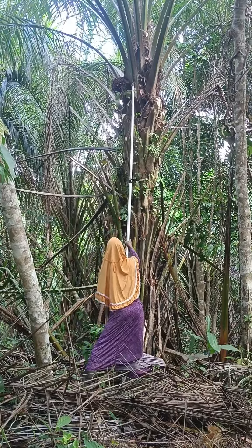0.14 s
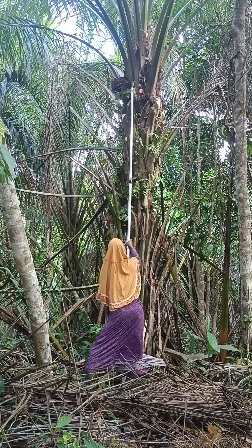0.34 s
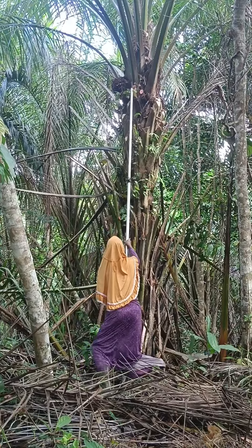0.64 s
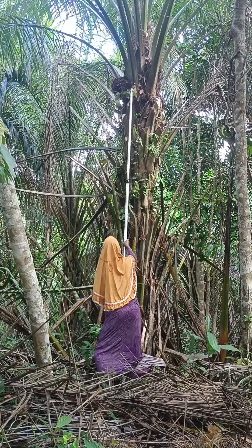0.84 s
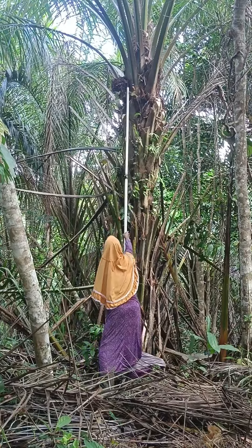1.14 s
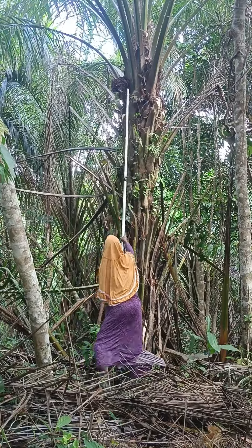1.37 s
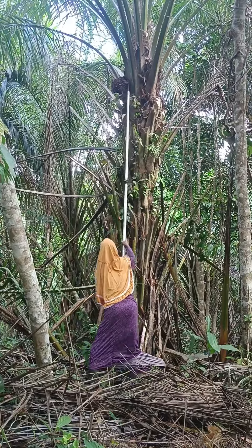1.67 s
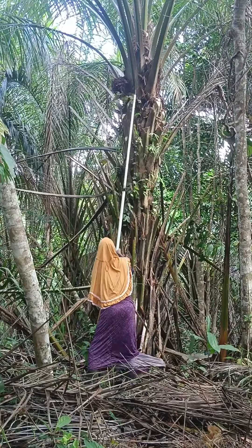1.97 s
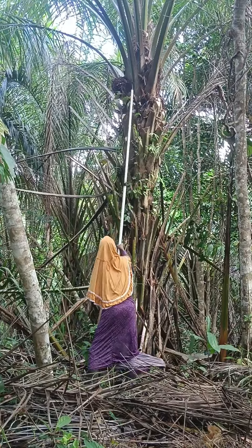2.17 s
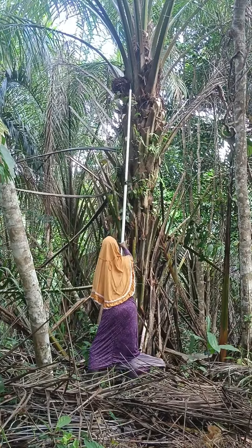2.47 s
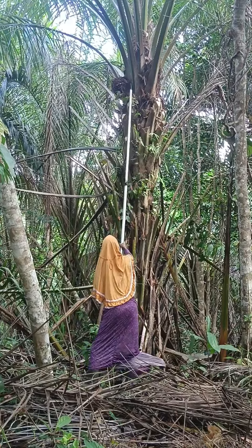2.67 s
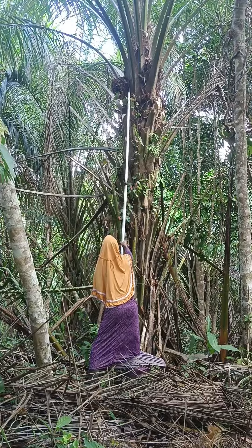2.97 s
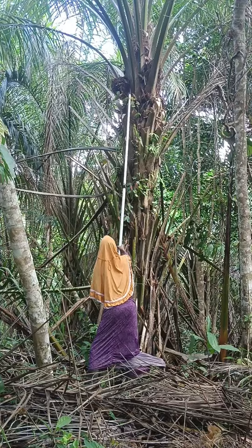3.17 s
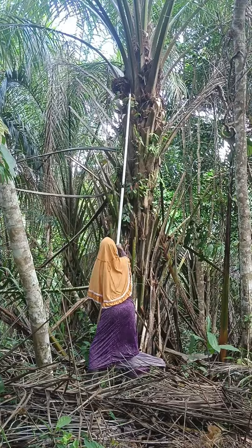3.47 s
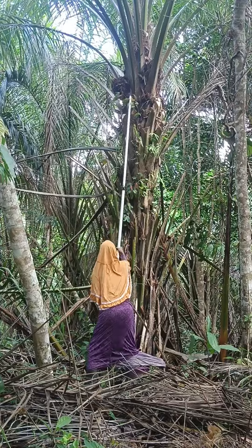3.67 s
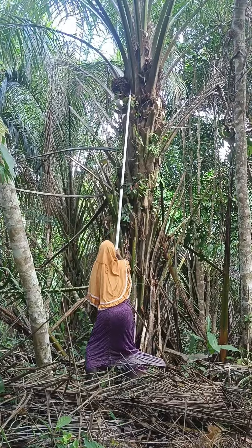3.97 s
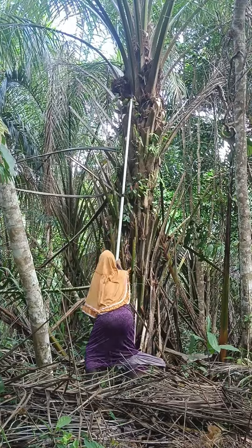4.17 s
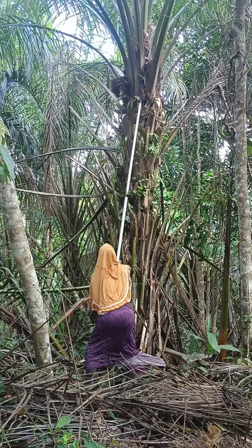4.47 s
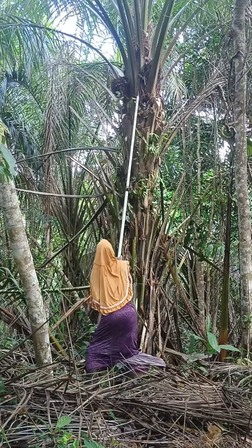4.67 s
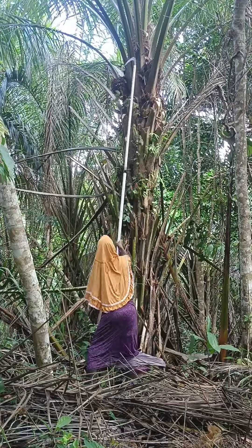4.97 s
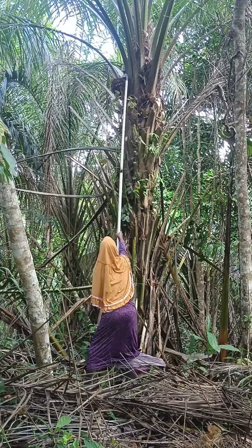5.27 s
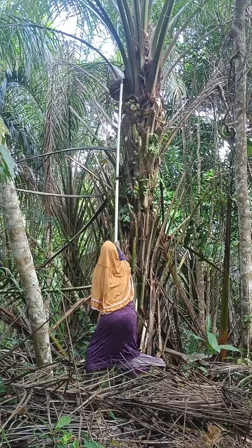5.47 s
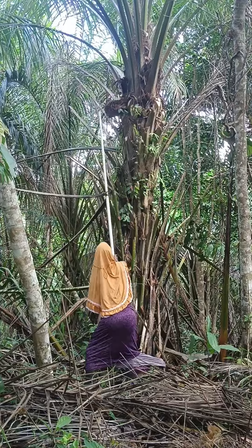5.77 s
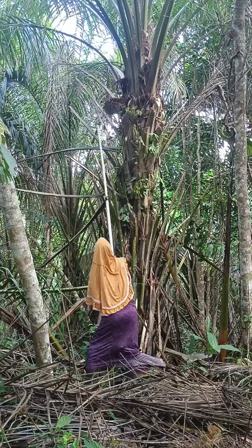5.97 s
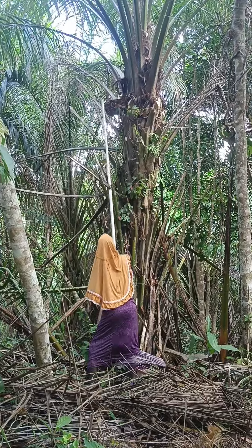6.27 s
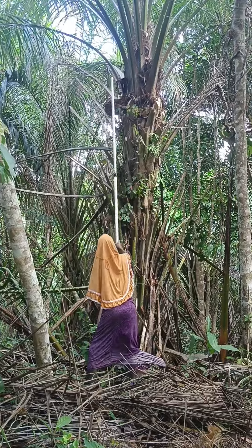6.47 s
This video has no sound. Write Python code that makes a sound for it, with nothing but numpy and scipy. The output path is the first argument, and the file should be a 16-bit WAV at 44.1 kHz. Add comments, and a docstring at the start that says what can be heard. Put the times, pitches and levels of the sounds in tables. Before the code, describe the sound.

A blade on a pole knocks and rasps at dry palm stalks overhead, with crisp cracks, crackling fronds and faint insect hiss behind.

```python
"""A blade works at the fibrous stalks in a palm crown: sharp knocks, short rasps and dry crackling.
Each knock is a sagging tone with a snap, a crack and a thud, followed by a short scattered tail.
The strokes are tiny random clicks, rung through stalk, hollow sheath and steel, or coloured as dry plants.
Insects hiss behind it in narrow noise bands, and the grove murmurs low as softly swelling coloured noise."""
import sys
import numpy as np
from scipy import signal
from scipy.fft import rfft, irfft, next_fast_len
from scipy.io import wavfile

SR = 44100
rng = np.random.default_rng(int(sys.argv[2]) if len(sys.argv) > 2 else 0)


def materialize(psi):
    """Save the field psi as 16-bit PCM at rate SR to the path in sys.argv[1].

    A 1-D psi becomes a single channel; in a 2-D psi each row is a channel.
    """
    bounded = np.clip(np.atleast_2d(psi).T, -1, 1)
    quanta = np.round(bounded * 32767).astype(np.int16)
    wavfile.write(sys.argv[1], SR, quanta)


N = 291925


def from_db(db):
    """Turns dB into a plain factor."""
    return 10 ** (np.asarray(db) / 20)


def rms_one(x):
    """Scales a sound to an average (rms) level of 1."""
    return x / np.sqrt(np.mean(x ** 2) + 1e-20)


def at_hz(points, hz):
    """Reads a table of (Hz, value) between its rows, along a logarithmic pitch scale."""
    table_hz, values = np.array(points).T
    return np.interp(np.log(hz), np.log(table_hz), values)


def drift(rate_hz):
    """A slow random wander with an rms of 1, made at every 40th sample and joined by lines."""
    r = np.exp(-2 * np.pi * rate_hz * 40 / SR)
    noise = rng.standard_normal(N // 40 + 2002)
    slow = signal.lfilter([1], [1, -2 * r, r * r], noise)[2000:]   # leave out the filter's start
    return np.interp(np.arange(N) / 40, np.arange(len(slow)), rms_one(slow))


def resonate(x, hz, width_hz):
    """One resonance with gain 1 on top."""
    r = np.exp(-np.pi * width_hz / SR)
    top = np.array([1, 0, -1]) * (1 - r * r) / 2
    return signal.lfilter(top, [1, -2 * r * np.cos(2 * np.pi * hz / SR), r * r], x)


def high_pass(x, hz):
    """Takes away what lies below a pitch."""
    return signal.sosfilt(signal.butter(2, hz, "high", fs=SR, output="sos"), x)


def colour(x, gain_at):
    """Shapes a spectrum by a gain that is a function of Hz."""
    size = next_fast_len(N)
    hz = np.maximum(np.arange(size // 2 + 1) * SR / size, 1)
    return irfft(rfft(x, size) * gain_at(hz), size)[..., :N]


def colour_db(x, spectrum):
    """Shapes a spectrum by a table of (Hz, dB)."""
    return colour(x, lambda hz: from_db(at_hz(spectrum, hz)))


def pair(a, b, likeness):
    """Two unrelated draws mixed to a left and right of the given likeness."""
    def alike(hz):
        return np.clip(at_hz(likeness, hz), 0, 1)
    mid = colour(a, lambda hz: np.sqrt(.5 + .5 * alike(hz)))
    side = colour(b, lambda hz: np.sqrt(.5 - .5 * alike(hz)))
    return np.array([mid + side, mid - side])


# Colour of the far air. Each row: pitch in Hz, relative strength per hertz in dB.
GROVE_SPECTRUM = [(13, -41.5), (22, 0), (118, 4), (450, -19), (747, -20), (1580, -25.5), (2690, -21.5),
                  (3240, -29), (4840, -19.5), (5390, -35.5), (6850, -3), (7830, -8.5), (11400, -20),
                  (13000, -25.5)]
# How alike the grove is in both ears. Each row: pitch in Hz, likeness from 0 to 1.
GROVE_LIKENESS = [(30, 0.13), (130, 0.41), (640, 0.034), (3000, .02)]


def grove():
    """Far air movement and rumble: coloured noise that swells gently, a little stronger on the right."""
    level_db = -65 + 0.9 * drift(1.8)
    air = colour_db(pair(*rng.standard_normal((2, N)), GROVE_LIKENESS), GROVE_SPECTRUM)
    return from_db(level_db) * rms_one(air) * from_db([[-1.6], [1.6]])


# Bands of the insect hiss. Each row: pitch in Hz, width in Hz, level in dB over the chorus level.
CHORUS_BANDS = [(4800, 250, -21.5), (7080, 930, -4.5), (7830, 1270, 0.1), (9640, 360, -15),
                (14600, 1300, -8)]
# How the chorus swells. Each row: time in seconds, chorus level in dB.
CHORUS_SWELL = [(0.0, -62.5), (1.77, -61), (5.25, -60.5), (5.68, -57.5), (6.1, -60), (6.62, -61)]


def insects():
    """A far chorus: many stridulations blur into hiss in a few steep bands, buzzing slightly."""
    chorus = np.zeros((2, N))
    swell_db = np.interp(np.arange(N) / SR, *np.transpose(CHORUS_SWELL))
    for hz, width_hz, band_db in CHORUS_BANDS:
        once = resonate(rng.standard_normal((2, N)), hz, width_hz)
        hiss = resonate(once, hz, width_hz)   # twice makes the band steep
        wander_db = 0.4 * drift(1.5) + 0.6 * drift(150)   # slow sway, fast buzz
        chorus += from_db(swell_db + band_db + wander_db) * rms_one(hiss)
    return chorus


# How alike the crown's clicks are in both ears. Each row: pitch in Hz, likeness from 0 to 1.
CROWN_LIKENESS = [(150, 0.91), (700, 0.52), (2000, 0.3), (6000, 0.31), (14000, 0.28)]


def grains(per_s, spread_db, clump_db):
    """Two draws of tiny clicks of uneven size that come in shared clumps."""
    size_db = spread_db * np.minimum(rng.exponential(1, (2, N)), 5)
    sizes = from_db(size_db) * rng.choice([-1, 1], (2, N))
    born = rng.random((2, N)) < per_s / SR
    clumps = from_db(clump_db * drift(60))
    return pair(*(sizes * born * clumps), CROWN_LIKENESS)


def after_knocks(level_db, t60_s):
    """A level that rises quickly at each knock and dies away by 60 dB in t60_s."""
    jumps = np.zeros(N)
    jumps[(np.array(KNOCKS)[:, 0] * SR).astype(int)] = from_db(level_db) ** 2
    dying = signal.lfilter([1], [1, -from_db(-120 / (t60_s * SR))], jumps + 1e-18)
    keep = np.exp(-1 / (0.0036 * SR))   # smoothing time of the rattle's and rustle's onset, in seconds
    return np.sqrt(signal.lfilter([1 - keep], [1, -keep], dying))


def crackle(level_db, shaken, spectrum, per_s, clump_db):
    """Dry plant matter crackles under the stroke and for a moment after each knock."""
    dense = colour_db(grains(per_s, spread_db=2.0, clump_db=clump_db), spectrum)
    return np.hypot(from_db(level_db), shaken) * rms_one(dense)


# Colour of the leaflets. Each row: pitch in Hz, relative strength per hertz in dB.
LEAFLET_SPECTRUM = [(3530, -25), (6000, -7), (7400, -16.5), (8230, -3.5), (8900, -3), (9940, 2),
                    (10900, -0.5), (14900, -5.5), (16000, -7.5)]


def leaflets(level_db, shaken_db):
    """Dry leaflets rustle: the densest and brightest of the clicks."""
    return crackle(level_db, after_knocks(shaken_db, 0.24), LEAFLET_SPECTRUM, per_s=6000, clump_db=1.0)


# Colour of the thin ribs. Each row: pitch in Hz, relative strength per hertz in dB.
RIB_SPECTRUM = [(2800, -35.5), (3500, -0.5), (4100, 1), (4700, -2.5), (5600, -10), (6600, -15.5),
                (8500, -27)]


def thin_ribs(level_db, shaken_db):
    """Thin ribs crackle in the middle treble."""
    return crackle(level_db, after_knocks(shaken_db, 0.23), RIB_SPECTRUM, per_s=3000, clump_db=0.5)


# Colour of the tearing fibre. Each row: pitch in Hz, relative strength per hertz in dB.
FIBRE_SPECTRUM = [(1100, -26.5), (1600, -9), (2100, -4.5), (2800, -3.5), (3300, -6), (4200, -43.5)]


def tearing_fibre(level_db, shaken_db):
    """Fibre tears in many small clicks, lower in pitch than the ribs."""
    return crackle(level_db, after_knocks(shaken_db, 0.23), FIBRE_SPECTRUM, per_s=2700, clump_db=0.5)


def rasp(level_db, modes):
    """The edge catches fibre after fibre; each catch rings the body."""
    catches = grains(per_s=2300, spread_db=-1.5, clump_db=4.0)
    body = np.zeros((2, N))
    for k, (hz, width_hz, mode_db) in enumerate(modes):
        body += (-1) ** k * from_db(mode_db) * resonate(catches, hz, width_hz)
    # one more broad resonance at the middle mode, as wide in Hz as the last mode's pitch,
    # softens what lies far outside
    middle_hz, broad_hz = modes[len(modes) // 2][0], modes[-1][0]
    return from_db(level_db) * rms_one(resonate(body, middle_hz, broad_hz))


def rattled(level_db, knock_db, t60_s):
    """A stroke level with the brief rattle of each knock added, in dB."""
    return 20 * np.log10(np.hypot(from_db(level_db), after_knocks(knock_db, t60_s)))


# Faint rings of the steel. Each row: pitch in Hz, width in Hz, strength in dB going into the last resonance.
BLADE_MODES = [(1780, 15, -4), (2023, 28, -0.5), (2280, 42, -7.5), (2490, 100, -19), (2926, 66, 2),
               (3140, 35, -7.5), (3860, 170, 6.5)]


def blade(ribs_db, fibre_db):
    """Steel rings faintly, 6 dB under the ribs, or under a cap set by the fibre."""
    return rasp(np.minimum(ribs_db, fibre_db + 6.5) - 6, BLADE_MODES)


# Sheath round the trunk. Each row: pitch in Hz, width in Hz, strength in dB going into the last resonance.
HOLLOW_MODES = [(261.4, 85, 1), (305.3, 70, 3.5), (443, 97, -4.5)]


def hollow_sheath(level_db, thud_db):
    """The hollow sheath rasps low under the stroke and rattles under each thud."""
    return rasp(rattled(level_db, thud_db - 13, t60_s=0.06), HOLLOW_MODES)


# Tones of the stalk. Each row: pitch in Hz, width in Hz, strength in dB going into the last resonance.
STALK_MODES = [(632, 92, 0), (776.5, 75, 5), (918.5, 25, 6), (1004, 99, 1), (1252, 41, 2),
               (1275.5, 50, 1.5), (1572, 110, -10.5), (1653, 34, -3.5), (1894, 560, -13)]


def stalk(level_db, ring_db, ring_t60_s):
    """The stalk rasps under the stroke and rattles under each ring, more so under a longer ring."""
    longer_db = 1.5 * np.log2(np.maximum(ring_t60_s, .004) / 0.056)   # 1.5 dB per doubling
    return rasp(rattled(level_db, ring_db - 14 + longer_db, t60_s=0.048), STALK_MODES)


# Strokes, the edge dragged through fibre. Each row: time of full pressure in seconds, seconds to swell
# by 30 dB (at least 0.003 is used), hold in seconds, then the layer levels in dB, before the knocks'
# shaking and the final filters: stalk rasp, hollow rasp, fibre tearing, thin ribs, leaflet rustle.
STROKES = [(0.231, -0.93, 0.087, -68.5, -79, -76, -73, -71),
           (0.488, -0.96, 0.066, -66.5, -71, -64, -65, -64.5), (0.798, 1, 0.081, -85, -95, -77, -80, -71),
           (1.184, 0.13, 0.038, -59.5, -65, -66.5, -66.5, -64),
           (1.234, 0.04, 0.056, -56.5, -58, -65.5, -61, -60),
           (1.267, -0.04, 0.005, -38, -62, -49.5, -57, -56),
           (1.282, -0.14, 0.0047, -40, -43.5, -48, -44.5, -47),
           (1.427, 0.34, .02, -66.5, -75, -70, -67, -61), (1.685, 0.26, 0.015, -93, -69, -68, -71.5, -67),
           (1.783, 0.16, 0.068, -54, -65.5, -51, -53, -41.5),
           (1.848, -0.0681, 0.029, -37, -47.5, -46.5, -43.5, -35.5),
           (1.905, 0.14, 0.033, -47, -53.5, -49.5, -48, -45),
           (1.971, -0.09, 0.0082, -52, -45, -76, -69, -69), (2.282, 0.5, 0.0044, -65, -72.5, -73, -75, -77),
           (2.47, 0.35, .005, -70, -81, -79, -79, -79), (2.666, 0.03, 0.03, -61, -73, -44, -52, -45),
           (2.92, 0.1, 0.058, -71.5, -71.5, -86, -84, -75),
           (2.981, -0.03, 0.0064, -36.5, -50.5, -49.5, -47, -45),
           (3.083, 0.65, 0.046, -68, -83, -59, -61, -65),
           (3.15, 0.08, 0.029, -41.5, -48, -45.5, -43.5, -40),
           (3.477, 0.7, 0.087, -75.5, -77.5, -80, -90, -86),
           (3.709, .03, 0.04, -46.5, -52, -50.5, -50.5, -47.5),
           (3.82, 0.34, 0.0041, -66.5, -72, -82, -83, -68), (4.026, 0.57, 0.0033, -70, -78, -70, -69, -73),
           (4.241, -0.0136, 0.099, -35.5, -48, -42.5, -42, -38),
           (4.282, -0.0425, 0.037, -34.5, -50.5, -48, -53, -55),
           (4.46, 0.39, .02, -61, -61.5, -61.5, -64, -64), (4.67, 0.1, 0.0029, -65, -73, -70, -64, -66),
           (4.942, 2, 0.079, -80, -80, -87, -66.5, -70), (5.097, 0.04, 0.0034, -53, -77, -69, -65, -60),
           (5.115, -0.03, 0.0018, -47.5, -66, -57, -68, -66), (5.128, 1, 0.052, -90, -86.5, -65, -78, -67),
           (5.295, 2.2, 0.071, -91, -81.5, -63, -66, -64), (5.401, 0.05, 0.019, -49, -82, -49, -47, -43.5),
           (5.443, -0.05, 0.051, -51, -59, -55.5, -52.5, -48),
           (5.522, -0.04, 0.0092, -49.5, -53.5, -59, -52, -51),
           (5.605, 0.18, 0.028, -57, -52.5, -47.5, -48, -45.5),
           (5.667, 0.09, 0.056, -47.5, -54.5, -45, -47.5, -43.5),
           (5.766, -0.04, 0.011, -43, -39.5, -37, -41.5, -37.5),
           (5.803, 0.5, 0.073, -49.5, -57.5, -48, -48.5, -42), (6.164, 7, 0.052, -72, -88, -76, -72, -72),
           (6.321, 0.1, 0.0055, -60.5, -54.5, -71, -63, -70), (6.36, 1.5, 0.036, -76, -78.5, -74, -80, -72),
           (6.413, 0.26, 0.056, -66, -76, -49.5, -53.5, -46)]
# How fast each layer falls after the hold, in dB per second, in the same order of layers.
FALL_DB_PER_S = [410, 378, 191, 169.7, 167]
# How fast each layer still builds up during the hold, in dB per second, in the same order of layers.
BUILD_DB_PER_S = [1, 30, 200, 250, 380]


def stroke_levels():
    """Level in dB of each layer: every stroke swells, holds, falls and settles; light parts build up late."""
    t = np.arange(0, N, 32)[:, None] / SR
    power = 1e-12
    for full_s, swell_s, hold_s, *peaks_db in STROKES:
        early = np.maximum(full_s - t, 0)
        swell_db = -30 * early / max(swell_s, .003)
        build_s = 0.55 * hold_s   # share of the hold through which the layers still build up
        build_db = -np.clip(full_s + build_s - t, 0, build_s) * BUILD_DB_PER_S
        late = np.maximum(t - full_s - hold_s, 0)
        settle_db = -35.5 - late * 52   # the crown keeps ticking faintly after a stroke
        fall_db = np.maximum(-late * FALL_DB_PER_S, settle_db)
        power = power + from_db(peaks_db + fall_db + build_db + swell_db) ** 2
    return [np.interp(np.arange(N) / SR, t[:, 0], 10 * np.log10(p)) for p in power.T]


# Left-right balance of the crown. Each row: pitch in Hz, left over right in dB.
CROWN_BALANCE = [(60, 12), (150, -5), (380, 0.5), (950, -1.5), (2380, 1), (5980, -2), (15000, -2.5)]


def balanced(crown):
    """Gives each ear half of the balance, with opposite signs."""
    left = colour(crown[0], lambda hz: from_db(at_hz(CROWN_BALANCE, hz) / 2))
    right = colour(crown[1], lambda hz: from_db(-at_hz(CROWN_BALANCE, hz) / 2))
    return np.array([left, right])


def scattered(direct):
    """Fronds and trunks return a short diffuse tail: small dying reflections, another set for each ear."""
    t = np.arange(SR // 5) / SR
    cloud = rng.standard_normal((2, len(t))) * from_db(-60 * t / 0.19) * (t > .002)
    cloud = high_pass(cloud, 450)   # long waves pass round thin things
    cloud *= from_db(-7.5) / np.linalg.norm(cloud, axis=1, keepdims=True)
    return direct + signal.fftconvolve(direct, cloud, axes=1)[:, :N]


def stalk_ring(t, ring_db, hz, t60_s):
    """A struck stalk's tone; it sags in pitch to hz as the contact relaxes."""
    phase = 2 * np.pi * hz * (t + 0.16 * 0.0018 * (1 - np.exp(-t / 0.00033)))
    tone = np.sin(phase) + 0.15 * np.sin(1.4 * phase)
    # a -22 dB ring builds over 0.36 of its period, a weaker one 0.28 dB longer per dB
    contact_cycles = 0.36 * from_db(-0.28 * (ring_db + 22))
    onset = 1 - np.exp(-t * hz / contact_cycles)
    return tone * from_db(ring_db - 60 * t / np.clip(t60_s, .004, .2)) * onset


def low_thud(t, thud_db, hz):
    """A low thump sagging in pitch, with the trunk booming under it."""
    sag = 0.55   # share of the listed pitch that the thud ends on; it starts near 1.3
    phase = 2 * np.pi * hz * (sag * t + (1.3 - sag) * 0.01538 * (1 - np.exp(-t / 0.0151)))
    thud = np.sin(phase) * from_db(thud_db - 60 * t / 0.091) * (1 - np.exp(-t / 0.0013))
    boom_db = -50 + 1.3 * (thud_db + 42)   # grows 1.3 dB per dB of thud
    boom = np.sin(2 * np.pi * 135.5 * t) * from_db(boom_db - 60 * t / 0.13) * (1 - np.exp(-t / 0.0077))
    return thud + boom


def crack_and_snap(t, crack_db, leaflet_db):
    """A crack of mid-treble noise and a brighter, shorter snap, set 1.5 dB over the leaflet setting."""
    hiss, noise = rng.standard_normal((2, len(t)))
    band = signal.butter(3, [1200, 3600], "band", fs=SR, output="sos")
    crack = signal.sosfilt(band, noise) * from_db(crack_db - 60 * t / 0.027) * (1 - np.exp(-t / .0008))
    snap = np.diff(hiss, prepend=0) * from_db(leaflet_db + 1.5 - 60 * t / 0.0093)
    return crack + snap


# Knocks. Each row: start in seconds, ring setting in dB, pitch the ring sags to in Hz, seconds for the
# ring to die by 60 dB (kept within 0.004 to 0.2), thud setting in dB, thud reference pitch in Hz,
# crack setting in dB before its band filter, shaken fibre in dB, shaken leaflets in dB,
# left over right in dB (not for the thud).
KNOCKS = [(0.242, -57, 1214, 0.084, -72, 323, -53, -73, -74, 2),
          (0.297, -42.5, 797, 0.021, -60, 415, -76, -72, -75, -5),
          (0.499, -55, 1270, 0.047, -77, 300, -53, -67, -76, -3),
          (0.802, -44.5, 1220, 0.035, -74, 201, -75, -85, -74, 0),
          (1.1, -57, 745, 0.025, -75, 302, -72, -82, -82, -4),
          (1.162, -51, 718, 0.054, -54.5, 435, -72, -86, -80, -19),
          (1.193, -41.5, 903, 0.047, -64, 310, -67, -72, -80, 1),
          (1.271, -24.5, 862, 0.022, -41.5, 236, -44, -41, -39, 0),
          (1.439, -50, 890, 0.018, -75, 388, -48, -86, -74, -8),
          (1.771, -43, 890, 0.042, -59, 300, -62, -70, -66, -3),
          (1.862, -32, 900, 0.029, -44, 295, -55, -64, -56, -1),
          (1.978, -29.5, 747, 0.016, -41, 268, -57, -75, -66, 6),
          (2.069, -50, 1040, 0.024, -63, 199, -56, -85, -78, -3),
          (2.126, -32.5, 646, 0.017, -46.5, 274, -32.5, -63, -65, 1.5),
          (2.275, -46.5, 757, 0.034, -65, 262, -47, -65.5, -68, -4),
          (2.6573, -24, 1380, 0.0028, -70, 303, -44, -62, -40.5, -1),
          (2.657, -27, 540, 0.02, -45, 351, -37, -40, -39.5, 1),
          (2.979, -26, 903, 0.02, -40.5, 290, -25, -45, -39, 1),
          (3.002, -28, 1200, 0.017, -43, 402, -22.5, -44, -44, -2),
          (3.045, -39, 1030, 0.02, -51, 496, -51, -54, -62, 0.5),
          (3.195, -39, 810, 0.024, -51, 398, -57, -66, -62, -3),
          (3.395, -57, 1790, 0.036, -65, 347, -71, -76, -81, -1.0),
          (3.463, -51.5, 850, 0.046, -63, 270, -49, -69, -78, -6),
          (3.709, -32, 947, 0.025, -58, 423, -49, -46.5, -57, 6.5),
          (3.95, -64, 1220, 0.014, -77, 300, -58, -71, -64, -3),
          (4.439, -45, 980, 0.029, -59.5, 476, -53.5, -63, -72, -1),
          (4.668, -51.5, 1006, 0.055, -78, 270, -65, -61.5, -75, -10),
          (4.719, -40, 433, 0.048, -33, 275, -67, -91, -80, -11),
          (4.96, -56.5, 2050, 0.016, -66, 200, -64, -59, -65, 25),
          (5.046, -46, 2320, 0.029, -74, 236, -46, -63, -83, -14),
          (5.088, -32, 582, 0.023, -58, 490, -26, -53.5, -58, 3.5),
          (5.119, -29, 2035, 0.02, -55, 497, -19.5, -52, -66, 5.5),
          (5.289, -43, 1560, 0.021, -76, 202, -68, -55, -69, -1),
          (5.376, -46, 2080, 0.016, -51, 290, -27.5, -49, -43, 1),
          (5.393, -30.5, 820, 0.026, -44, 435, -24, -69, -42, 4),
          (5.518, -56, 348, 0.012, -41.5, 320, -26, -63, -70, 2),
          (5.551, -37, 445, 0.021, -43.5, 424, -21, -47.5, -66, 1),
          (5.578, -35.5, 1730, 0.027, -49.5, 450, -31, -56, -75, 6),
          (5.618, -26.5, 1260, 0.014, -47, 398, -25.5, -58, -58.5, 0),
          (5.644, -34, 2100, 0.017, -64, 222, -44, -53, -43.5, 4),
          (5.696, -39, 785, 0.018, -43, 384, -26, -55, -55, 4),
          (5.737, -19.5, 830, 0.016, -32, 237, -15, -54, -52, 0.0),
          (5.749, -2.5, 886, 0.0049, -26, 236, -24, -35.5, -37, 1),
          (5.857, -33.5, 1340, 0.031, -48.5, 360, -41, -67, -60, -2),
          (6.0018, -33, 1170, 0.011, -61.5, 195, -53, -70, -73, -1.5),
          (6.143, -53.5, 676, 0.025, -77, 202, -60.5, -77, -74, 3),
          (6.18, -47, 716, 0.036, -71, 202, -44, -83, -79, 1),
          (6.221, -47, 2850, 0.0096, -75, 206, -43, -57.5, -72, 21),
          (6.249, -47, 2250, 0.015, -77, 200, -32.5, -80, -73, 1),
          (6.308, -39.5, 458, 0.033, -45, 315, -39, -61, -65, 5),
          (6.41, -65, 1980, 0.012, -63.5, 202, -59, -54, -34.5, 33),
          (6.446, -12.5, 880, 0.0062, -43, 270, -60, -67, -57, -0.5),
          (6.487, -36.5, 597, 0.019, -48.5, 293, -60.5, -66.5, -64, -1)]


def knocks():
    """Each knock adds a bright snap, a crack and a ring, placed left or right, to a central low thud."""
    out = np.zeros((2, N + SR))
    t = np.arange(SR // 4) / SR
    for s, ring_db, hz, t60_s, thud_db, thud_hz, crack_db, _, leaflet_db, pan_db in KNOCKS:
        bright = stalk_ring(t, ring_db, hz, t60_s) + crack_and_snap(t, crack_db, leaflet_db)
        placed = bright * from_db([[pan_db / 2], [-pan_db / 2]])
        at = int((s + 0.001333) * SR)   # the edge bites for a moment before the stalk gives
        out[:, at:at + len(t)] += placed + low_thud(t, thud_db, thud_hz)
    return scattered(high_pass(out[:, :N], 95))   # slender stems radiate no deep bass


def scene():
    """The crown lies a little to the right; the grove surrounds."""
    stalk_db, hollow_db, fibre_db, ribs_db, leaflet_db = stroke_levels()
    (s, ring_db, _, ring_t60_s, thud_db, _, _,
     shaken_fibre_db, shaken_leaflet_db, _) = np.transpose(KNOCKS)
    # ribs shake where the edge is among them
    ribs_share_db = np.clip((ribs_db - fibre_db)[((s + .011) * SR).astype(int)], -15, 4)
    crown = leaflets(leaflet_db, shaken_leaflet_db)
    crown += thin_ribs(ribs_db, shaken_fibre_db + ribs_share_db)
    crown += tearing_fibre(fibre_db, shaken_fibre_db)
    crown += blade(ribs_db, fibre_db)
    crown += hollow_sheath(hollow_db, thud_db)
    crown += stalk(stalk_db, ring_db, ring_t60_s)
    left, right = balanced(high_pass(crown, 110)) + knocks()
    left = np.roll(left, 6)   # samples by which the crown reaches the left microphone later
    return grove() + insects() + np.array([left, right])


def record(dry):
    """The top is cut steeply above 15850 Hz."""
    return signal.sosfilt(signal.ellip(12, .5, 60, 15850, fs=SR, output="sos"), dry)


dry = scene()
out = record(dry)
materialize(out)
```